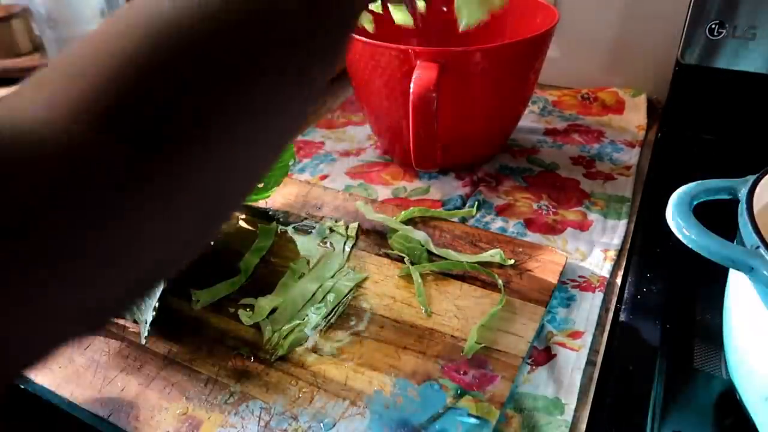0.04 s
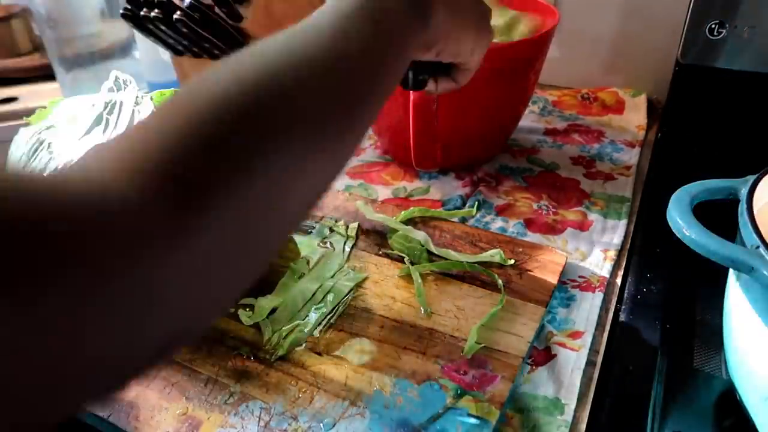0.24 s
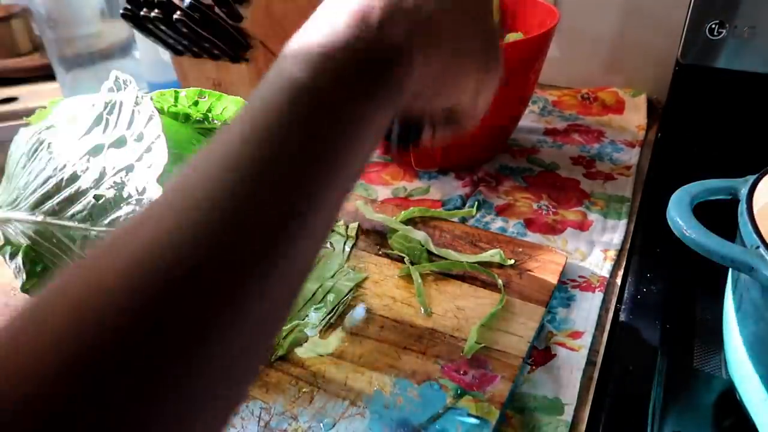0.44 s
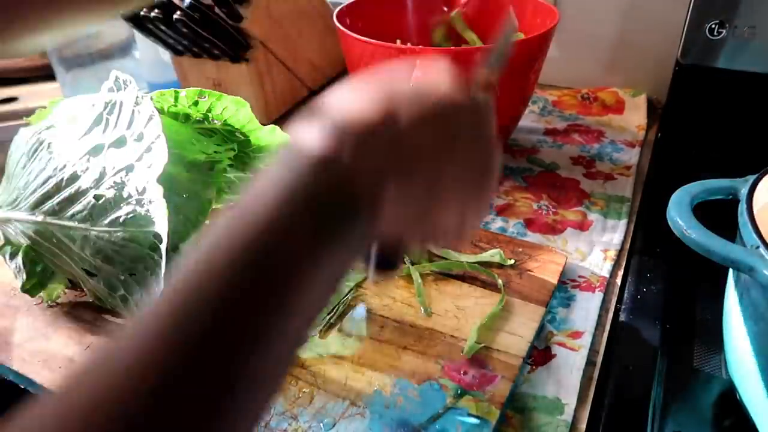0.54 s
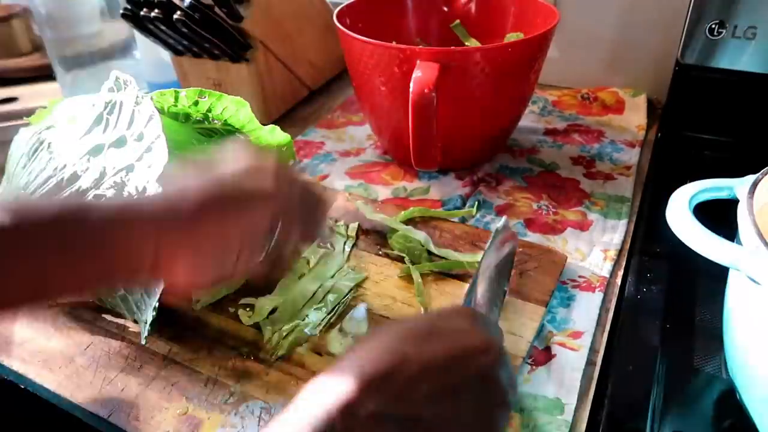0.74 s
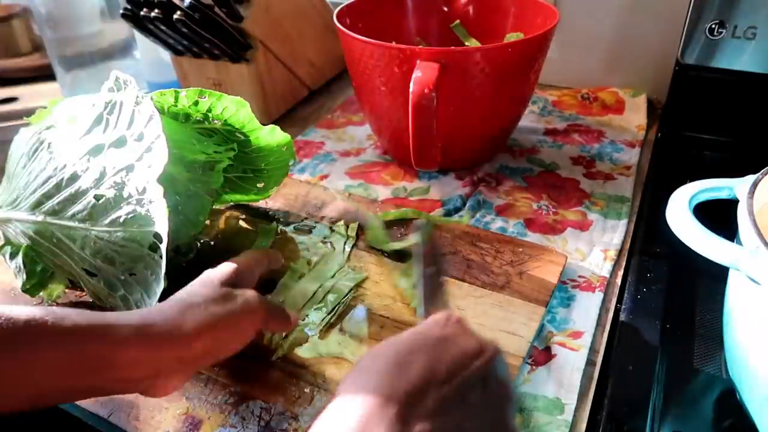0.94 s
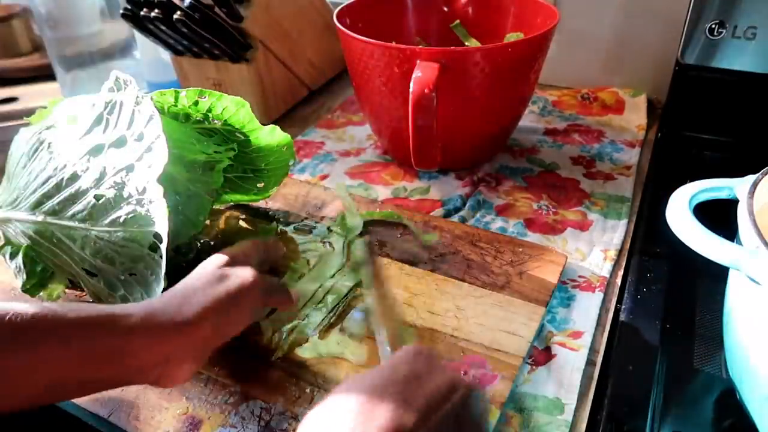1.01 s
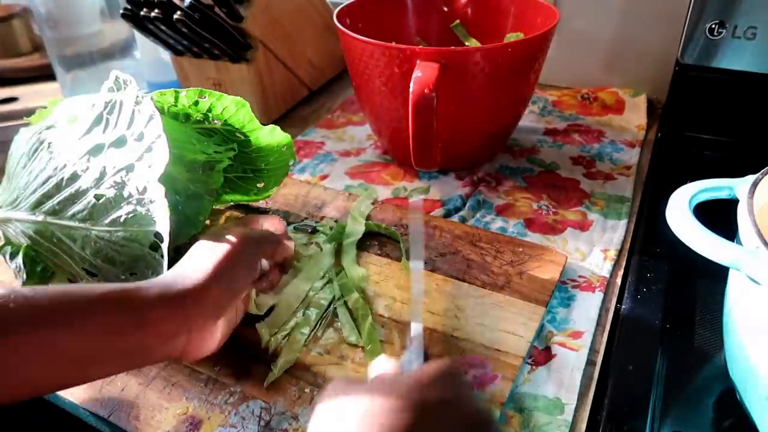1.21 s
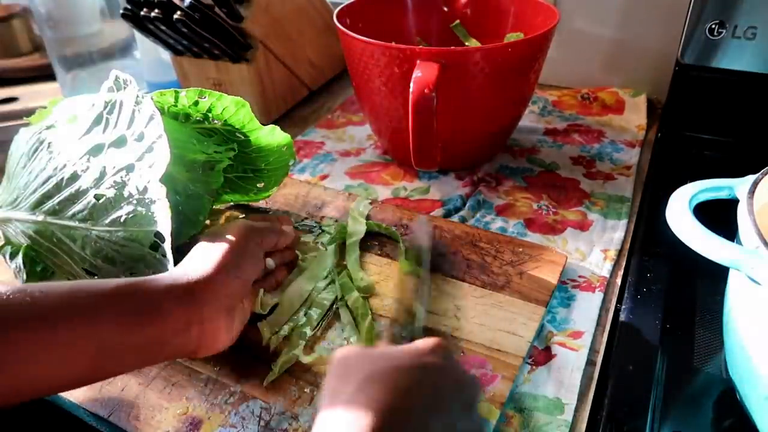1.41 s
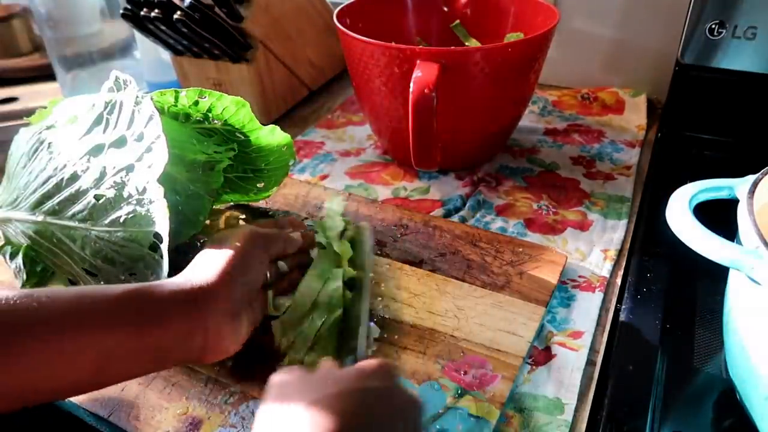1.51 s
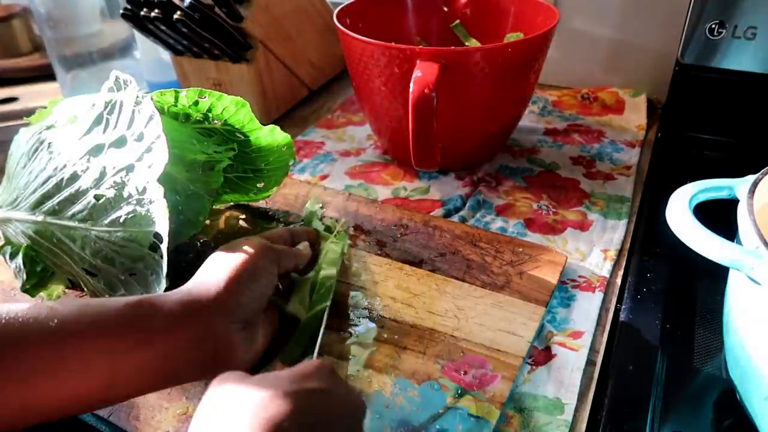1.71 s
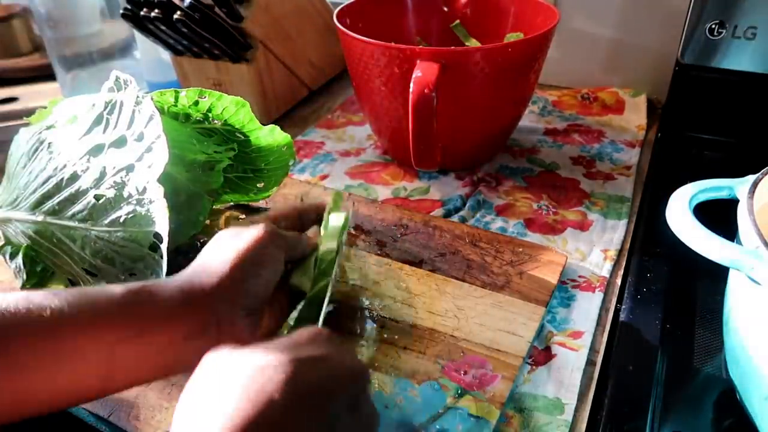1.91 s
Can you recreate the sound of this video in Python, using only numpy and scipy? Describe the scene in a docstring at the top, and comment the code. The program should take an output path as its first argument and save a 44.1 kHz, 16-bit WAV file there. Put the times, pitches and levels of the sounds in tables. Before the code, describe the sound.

Knife work on a wooden board, close in a small kitchen with quiet hum. Faint leafy rustling and soft low thuds open; at 0.24-0.31 s a plastic bowl is knocked, clattering and thumping on the counter. The blade lands hard at 0.81 s, scrapes shreds with faint metallic singing around 0.9-1.1 s, lands harder at 1.4 s, then lighter knocks at 1.5 s and faint taps until 1.8 s.

```python
"""A hand rustles faintly in a bowl, with two soft low thuds, at first; then a knife knocks the plastic bowl,
which rocks on the counter. In a small kitchen, close to a stereo phone, the blade gathers shredded cabbage
on a wooden board: it lands hard twice, scrapes the shreds between the landings, and faint taps follow.
Bowl, board, blade and counter are banks of decaying modes set ringing by contact forces; leaves are
shaped random clicks. The room rings over a quiet hum, and the loudest peaks are flattened."""
import sys
import numpy as np
from scipy import signal
from scipy.fft import rfft, irfft
from scipy.io import wavfile
from scipy.ndimage import uniform_filter1d

SR = 44100
rng = np.random.default_rng(int(sys.argv[2]) if len(sys.argv) > 2 else 0)


def bounce(signal):
    """Save signal as a 16-bit WAV file at the path given by the first command-line argument."""
    frames = np.transpose(np.atleast_2d(signal))
    limited = np.clip(frames, -1, 1)
    pcm = np.round(limited * 32767).astype(np.int16)
    wavfile.write(sys.argv[1], SR, pcm)


N = 85995  # samples
TIME_S = np.arange(N) / SR


def undb(db):
    """Amplitude ratio for a level in dB."""
    return 10 ** (np.asarray(db) / 20)


def unit(x):
    """Scale to an RMS of 1."""
    return x / np.sqrt(np.mean(x ** 2) + 1e-18)


def colour(x, table):
    """Shape the spectrum by (f/Hz, level/dB) points, joined along log frequency."""
    hz, db = np.array(table).T
    f = np.maximum(np.fft.rfftfreq(x.shape[-1], 1 / SR), 1)
    gain = undb(np.interp(np.log(f), np.log(hz), db))
    return irfft(rfft(x) * gain, x.shape[-1])


def band(x, lo_hz, hi_hz):
    """Keep the sound between two frequencies."""
    return signal.sosfilt(signal.butter(2, [lo_hz, hi_hz], "band", fs=SR, output="sos"), x)


def ring(force, modes, tilt_db=lambda hz: 0, share=1):
    """A force rings a bank of decaying modes, neighbours in opposite phase; share scales each decay."""
    out = 0
    for k, (hz, db, t60) in enumerate(modes):
        radius = np.exp(-np.log(1000) / (t60 * share * SR))
        angle = 2 * np.pi * hz / SR
        resonator = [1, -2 * radius * np.cos(angle), radius * radius]
        out = out + (-1) ** k * undb(db + tilt_db(hz)) * signal.lfilter([.5, 0, -.5], resonator, force)
    return out


def push(ms):
    """A raised-cosine contact force of unit area; a longer contact excites less treble."""
    pulse = np.hanning(int(ms * SR / 1000) + 3)[1:-1]
    return pulse / pulse.sum()


def blows(rows):
    """A force with one push at each (t/s, level/dB, contact/ms)."""
    force = np.zeros(N + 2000)
    for s, db, ms in rows:
        pulse, start = push(ms), int(s * SR)
        force[start:start + len(pulse)] += undb(db) * pulse
    return force[:N]


def grains(rate, scatter_db):
    """Random clicks of either sign, rate per second, a few much larger than the rest."""
    chance, sign, size = rng.random((3, N))
    return (chance < rate / SR) * np.sign(sign - .5) * undb(-scatter_db * np.log(1 - size))


def fade(s, db, t60):
    """A level that starts at s and dies away by 60 dB in t60 seconds."""
    t = TIME_S - s
    return undb(db - 60 * np.maximum(t, 0) / t60) * (t >= 0)


def walk(rate):
    """Smoothed random steps, rate per second, with an RMS of 1."""
    hold = int(SR / rate)
    steps = np.repeat(rng.standard_normal(N // hold + 1), hold)
    return unit(uniform_filter1d(steps, hold)[:N])


def region(centre_hz, octaves):
    """dB by which a mode is weaker, the further it lies from the region that a blow favours."""
    return lambda hz: -6 * (np.log2(hz / centre_hz) / octaves) ** 2


# spectrum of the kitchen air [f/Hz, level/dB per Hz, relative]
AIR_SPECTRUM = [(15, -44), (25, -11), (43, -0.5), (127, -6.5), (187, -14.5), (231, -4), (377, -12),
                (418, -14.5), (600, -17), (665, -21.5), (797, -24), (1600, -25.5), (12000, -47),
                (15600, -62), (22000, -120)]
HUM_DB, HUM_WIDTH = -44.5, 0.64
WHINE_HZ, WHINE_DB = 13050, -64


def hum():
    """Shaped noise for quiet kitchen air, widened above the bass, and a faint, wavering high whine."""
    mid, side = colour(rng.standard_normal((2, N)), AIR_SPECTRUM)
    side = HUM_WIDTH * band(side, 290, 21000)
    air = unit(np.array([mid + side, mid - side])) * undb(HUM_DB)
    whine = unit(band(rng.standard_normal(N), WHINE_HZ - 40, WHINE_HZ + 40))
    return air + undb(WHINE_DB) * whine


# how long the room rings [f/Hz, t60/s]
ROOM_DECAYS = [(100, 0.44), (400, 0.47), (1500, 0.63), (5000, 0.63), (12000, 0.2)]
ROOM_DB, EARLY_DB, EARLY_T60_S = -16, -10.5, 0.2
ROOM_WIDTH, TREBLE_WIDTH, WIDE_ABOVE_HZ = 0.12, 1, 9900


def room(x):
    """Dense early reflections and a longer tail whose decay depends on frequency, shortest in the treble."""
    t, tail = np.arange(SR) / SR, 0
    hz, t60 = np.array(ROOM_DECAYS).T
    for centre in 60 * 2. ** np.arange(8):  # octave bands
        noise = band(rng.standard_normal((2, SR)), centre / np.sqrt(2), centre * np.sqrt(2))
        tail = tail + noise * undb(-60 * t / np.interp(np.log(centre), np.log(hz), t60))
    early = rng.standard_normal((2, SR)) * undb(-60 * t / EARLY_T60_S)
    unit_energy = lambda h: h / np.sqrt(np.sum(h[0] ** 2))
    echo = undb(ROOM_DB) * unit_energy(tail) + undb(EARLY_DB) * unit_energy(early)
    mid, other = echo * np.minimum(t / 0.00105, 1)  # builds up over about 1 ms
    side = ROOM_WIDTH * other + TREBLE_WIDTH * band(other, WIDE_ABOVE_HZ, 10700)
    response = np.array([mid + side, mid - side])
    return signal.fftconvolve(x[None], response, axes=1)[:, :N]


# modes of the counter [f/Hz, level/dB, t60/s]
COUNTER_MODES = [(62.3, -32.5, 0.28), (135.3, -9.5, 0.081), (91, -16.5, 0.11), (185.4, -20, 0.087),
                 (225, -22, .2), (291, -19.5, 0.077), (404, -30.5, 0.76)]
# thuds through the counter [t/s, level/dB, contact/ms]
COUNTER_THUDS = [(.010, -14.5, 5.6), (.021, -17.5, 4.1), (.2425, -1.5, 1.9), (.2803, 12, 2.6),
                 (.308, 5, 3.64), (.366, -36, 1), (.53, -21.5, 5.4), (.811, -14.5, 1.4),
                 (1.4065, -8.5, 2.1)]


def thuds():
    """Soft pushes ring the low modes of the counter."""
    return ring(blows(COUNTER_THUDS), COUNTER_MODES)


# modes of the steel blade [f/Hz, level/dB, t60/s]
BLADE_MODES = [(1160, -16, 0.21), (1486, -14.5, 0.53), (1988, -19, 0.13), (2760, -26, .15),
               (3470, -17, 0.12), (4066, -18.5, 0.16), (4320, -18, 0.086), (4592, -9.5, 0.15),
               (5270, -24, 0.14), (6035, -15, 0.085), (6360, -16.5, 0.1), (6680, -19, 0.14),
               (7800, -34, 0.05)]
# one blade mode sings out while the edge drags [start t/s, length/s, near f/Hz, level/dB]
BLADE_SWELLS = [(.885, .075, 4055, -46), (.93, .07, 4590, -47), (0.987, .03, 5320, -46),
                (1.018, 0.045, 4260, -45), (1.018, .03, 6360, -38), (1.025, 0.08, 1988, -43.5),
                (1.078, 0.042, 4590, -47), (1.062, .04, 3450, -48), (1.085, .05, 4260, -50),
                (1.08, .025, 5320, -49), (1.79, 0.17, 1138, -55)]


def swells():
    """Friction, as noise, feeds one mode of the blade for a moment, rising and falling."""
    out = 0
    for s, length, hz, db in BLADE_SWELLS:
        mode = min(BLADE_MODES, key=lambda m: abs(m[0] - hz))
        tone = unit(ring(rng.standard_normal(N), [mode]))
        out = out + undb(db) * tone * np.sin(np.pi * np.clip((TIME_S - s) / length, 0, 1))
    return out


# modes of the wooden board [f/Hz, level/dB, t60/s]
BOARD_MODES = [(263.5, -5, 0.24), (394.7, 0.5, 0.11), (501, 4, 0.076), (590.6, -1, .12), (708, 2.5, 0.071),
               (798, -5.5, 0.13), (877, 2, 0.055), (987, -1, 0.04), (1092, 2, 0.083), (1292, 5, 0.037),
               (1463, 0, 0.065), (1625, -1, 0.07), (2115, -10, 0.19), (2310, -9, 0.07), (2620, -6, 0.016),
               (3115, 1, 0.03)]
# three spells: a hand rustling in the bowl, then two of scraping and handling
# [t/s, rustle level/dB, jerks in counter level/dB, jerks in board level/dB, blade over rustle level/dB]
SCRAPE_SPELLS = [
    [(0.0, -41, -40, -38, -15), (0.02, -46, -32.5, -49, -7), (0.054, -45.5, -41, -41, -14),
     (0.094, -45, -48, -43, -19), (0.104, -33, -47, -54, -6.5), (0.114, -37.5, -46, -40.5, -8.5),
     (0.214, -46.5, -41, -51, -10), (0.225, -28.5, -43, -30, -7)],
    [(0.88, -38.5, -35.5, -39, -15), (0.94, -42, -62, -42.5, -0.5), (0.968, -40, -52, -49, -5),
     (0.985, -37.5, -33, -35, -11), (1.032, -30.5, -31, -44, -3.5), (1.054, -34, -35, -33, -10),
     (1.108, -39.5, -38.5, -59, 1), (1.132, -44.5, -71, -43.5, -14), (1.218, -60, -51, -49.5, -20),
     (1.3, -73, -64, -60, -10)],
    [(1.5, -43, -47, -42, -14), (1.524, -44.5, -38, -42, -15), (1.584, -42, -41, -44, -21),
     (1.634, -38.5, -39, -34.5, 0), (1.694, -53, -56, -42.5, -21), (1.732, -48, -40.5, -60, -6),
     (1.774, -63, -64, -45, -20), (1.804, -65, -48, -55, -18), (1.82, -76, -71, -54.5, -15),
     (1.95, -79, -64, -49, -14)],
]
# spectrum of the leaves [f/Hz, level/dB per Hz, relative]
LEAF_SPECTRUM = [(290, -40), (500, -7), (1000, -15.5), (1170, -9), (1800, -14.5), (2040, -10.5),
                 (3830, -18.5), (6240, -22), (14000, -26)]
GRAINS_PER_S, GRAIN_SCATTER_DB, RUSTLE_WANDER_DB = 1900, 2.2, 3
SLIPS_PER_S, SLIP_SCATTER_DB, SLIP_MS = 900, 1.5, 1.65
SING_WANDER_DB, SING_WANDER_PER_S = 4, 22


def rustle_and_scrape():
    """Leaves crackle as random clicks; noise sings in the blade modes; small jerks ring counter and board."""
    def gain(*columns):
        total = 0
        for spell in SCRAPE_SPELLS:
            rows = np.array(spell)
            db = sum(np.interp(TIME_S, rows[:, 0], rows[:, k], -120, -120) for k in columns)
            total = total + undb(db)
        return uniform_filter1d(total, size=300)

    clicks = grains(GRAINS_PER_S, GRAIN_SCATTER_DB) * undb(RUSTLE_WANDER_DB * walk(60.16))
    leaves = unit(colour(clicks, LEAF_SPECTRUM))
    sing = 0
    for mode in BLADE_MODES:
        friction = rng.standard_normal(N) * undb(SING_WANDER_DB * walk(SING_WANDER_PER_S))
        sing = sing + ring(friction, [mode])
    slips = np.convolve(grains(SLIPS_PER_S, SLIP_SCATTER_DB), push(SLIP_MS))[:N]
    counter = unit(ring(slips, COUNTER_MODES, share=0.47))
    wood = unit(ring(slips, BOARD_MODES, share=0.38))
    return gain(1) * leaves + gain(1, 4) * unit(sing) + gain(2) * counter + gain(3) * wood


# a faint early tick, then the edge catching as it scrapes [t/s, level/dB, contact/ms, counter level/dB]
EDGE_CATCHES = [(.1, -46, .1, -33), (0.994, -31, 0.76, -7), (1.0007, -31, 1, -12), (1.0073, -27, 0.83, -7),
                (1.0223, -33.5, 0.36, -16), (1.0285, -29.5, 0.42, -15), (1.0367, -28, 0.43, -6),
                (1.0453, -32, 0.5, -11), (1.054, -33, .9, -19), (1.063, -33, 1, -27),
                (1.078, -35.5, .4, -13), (1.09, -34, .4, -24)]


def catches():
    """Each catch knocks the board, the blade and the counter, with shortened wood and counter decays."""
    force = blows([row[:3] for row in EDGE_CATCHES])
    low = blows([(s, counter_db, 2.5) for s, _, _, counter_db in EDGE_CATCHES])
    wood = ring(force, BOARD_MODES, share=0.32)
    steel = undb(-4.5) * ring(force, BLADE_MODES)
    return wood + steel + ring(low, COUNTER_MODES, share=0.34)


# modes of the plastic bowl [f/Hz, level/dB, t60/s]
BOWL_MODES = [(490.4, -5, 0.19), (608, -13, 0.072), (398, -11.5, 0.076), (930, -18.5, 0.11),
              (1085.5, -15, 0.3), (1443, -12, 0.046), (2360, -11.5, 0.19), (2510, -15, 0.16),
              (2724, -9, 0.11), (2890, -31, 0.092), (3980, -14, 0.04), (4540, -4.5, 0.068),
              (5210, -8, 0.04), (5950, -9, .05), (6110, -1, 0.056)]
# knocks on the bowl [t/s, relative level/dB, contact/ms, clatter level/dB, loudest region f/Hz, width/octaves]
BOWL_KNOCKS = [(0.2411, 8, 0.24, -6, 1200, 5.2), (0.2472, -3, 0.21, -16.5, 2400, 2.2),
               (0.2524, -5, 0.63, -22, 500, 1.3), (.259, 5, 0.6, -26, 1100, 0.89),
               (.264, -1.5, .4, -26, 1000, .8), (0.271, 2, 0.15, -20, 2750, .3),
               (0.2755, 2.5, 0.27, -10, 1600, 0.73), (.2785, 5, .15, -8, 2700, .9),
               (0.306, -19, 0.23, -30, 1100, 0.91), (0.357, -27, 0.32, -52, 1090, 1.5),
               (0.409, -39, 0.4, -31, 600, 2)]
# spectrum of the clatter [f/Hz, level/dB per Hz, relative]
CLATTER_SPECTRUM = [(290, -3), (500, -8), (990, -8.5), (1080, -3.5), (1250, -11.5), (4050, -15),
                    (10900, -30.5), (14000, -64)]
CLATTER_T60_S, SETTLE_T60_S, SETTLE_DB = 0.036, 0.31, -22  # shreds tumble, then settle more quietly
BOWL_LANDS_S, LANDED_T60_S = 0.282, 0.035  # set down, the bowl soon stops ringing


def bowl():
    """Knocks ring the plastic, clatter, and shake the shreds inside."""
    noise = unit(colour(rng.standard_normal(N) + grains(1700, 2.9), CLATTER_SPECTRUM))
    damp = fade(BOWL_LANDS_S, 0, LANDED_T60_S) + (TIME_S < BOWL_LANDS_S)
    out = 0
    for s, db, ms, clatter_db, centre_hz, octaves in BOWL_KNOCKS:
        plastic = .5 * ring(blows([(s, db, ms)]), BOWL_MODES, region(centre_hz, octaves))
        if s < BOWL_LANDS_S:
            plastic = plastic * damp
        clatter = fade(s, clatter_db, CLATTER_T60_S)
        settling = fade(s, clatter_db + SETTLE_DB, SETTLE_T60_S)
        out = out + plastic + noise * (clatter + settling)
    return out


# blade on the board [t/s, relative level/dB, contact/ms, loudest region f/Hz, width/octaves,
# spacing of the modes this spot favours f/Hz, then, relative to the blow: blade level/dB,
# crack level/dB, crunch of crushed leaves level/dB; left minus right level/dB]
BOARD_BLOWS = [(.8104, -1, 0.15, 1000, 1.5, 1300, -19.5, -16, -26, 2.5),
               (.8195, -9, .6, 590, .2, 9000, -30, -30, -40, 2),
               (.829, -17, .3, 1625, .15, 9000, -30, -30, -40, 2),
               (1.398, -28, 0.3, 860, .6, 9000, -30, -31, -18, -1),
               (1.4055, 4, 0.25, 1020, 1.5, 653, -30, -18, -44, 2),
               (1.421, -7, .4, 1090, 0.1, 9000, -37, -35, -43, 1),
               (1.430, -23, .2, 2100, .2, 9000, -28, -30, -38, 2),
               (1.438, -8, .45, 1110, 0.4, 9000, -36, -39, -32, 3),
               (1.513, -18, 0.79, 394, 1.6, 3000, -48, -37, -40, 0),
               (1.5362, -9, 1.0, 395, 1.6, 3020, -30, -37, -39, 1.5),
               (1.555, -16.5, 1.1, 333, 0.76, 3000, -30, -27, -47, 5),
               (1.605, -29, 0.56, 2200, 1, 9000, -30, -4, -12, 2),
               (1.629, -31.5, 0.25, 1280, 0.35, 9000, -32, -5, -15, 7),
               (1.720, -22.5, 0.33, 494, 0.32, 3000, -45, -28, -41, 0),
               (1.727, -23.5, 1.05, 496, 0.23, 3000, -41, -43, -42, 0),
               (1.733, -23, 0.73, 499, 0.36, 3000, -43, -38, -37, 1),
               (1.741, -27, 0.88, 412, 0.75, 2980, -37, -40, -36, 0),
               (1.7415, -29.5, .15, 2320, 0.2, 9000, -37, -13.5, -25.5, 3),
               (1.791, -21, 0.087, 2370, 0.13, 8900, -40, -38, -39, 3),
               (1.791, -34, 0.35, 1100, 0.39, 9000, -40, -34, -34, -1)]
SLAP_DB, SLAP_PER_DB, SLAP_SHARE = 12, 0.32, 0.13  # extra short ring; softer landings slap less
MISS_DB = -7.5  # for modes midway between those that the spot favours
CRACK_T60_S, CRACK_HZ, CRUNCH_T60_S, CRUNCH_HZ = 0.013, 2900, 0.22, 2670


def board():
    """Each landing rings the board where it is struck, the blade a little, with a crack and a crunch."""
    out = 0
    noise = unit(band(rng.standard_normal(N), CRACK_HZ / 3, CRACK_HZ * 3.57))
    leaves = unit(band(grains(3000, 1.7), CRUNCH_HZ / 1.41, CRUNCH_HZ * 1.27))
    for s, db, ms, region_hz, octaves, miss_hz, blade_db, crack_db, crunch_db, pan_db in BOARD_BLOWS:
        favoured = region(region_hz, octaves)
        tilt = lambda hz: favoured(hz) + MISS_DB * np.sin(np.pi * hz / miss_hz) ** 2
        force = blows([(s, db - 12, ms)])
        slap = undb(SLAP_DB + SLAP_PER_DB * db) * ring(force, BOARD_MODES, tilt, share=SLAP_SHARE)
        wood = ring(force, BOARD_MODES, tilt) + slap
        steel = ring(blows([(s, db + blade_db, .05)]), BLADE_MODES)
        crack = noise * fade(s, db + crack_db, CRACK_T60_S)
        crunch = leaves * fade(s, db + crunch_db, CRUNCH_T60_S)
        pan = undb(np.array([[pan_db], [-pan_db]]) / 2)
        out = out + (wood + steel + crack + crunch) * pan
    return out


def scene():
    """Everything close to the microphones, its ring in the room, and the hum behind."""
    near = thuds() + swells() + rustle_and_scrape() + catches() + bowl() + board()
    return hum() + room(near.mean(axis=0)) + near


PORT_LAG_S, BASS_CUT_HZ, TOP_HZ = 3.0e-5, 20, 15500
PEAK_LIMIT = 1.


def record(dry):
    """Sound reaches the right microphone port a moment late; deep bass is lost, peaks flatten, the top is cut."""
    f = np.fft.rfftfreq(N, 1 / SR)
    late = irfft(rfft(dry[1]) * np.exp(-2j * np.pi * f * PORT_LAG_S), N)
    bass_cut = signal.butter(1, BASS_CUT_HZ, "high", fs=SR, output="sos")
    x = signal.sosfilt(bass_cut, np.array([dry[0], late]))
    top_cut = signal.ellip(8, .2, 70, TOP_HZ, fs=SR, output="sos")
    return signal.sosfilt(top_cut, np.clip(x, -PEAK_LIMIT, PEAK_LIMIT))


dry = scene()
out = record(dry)
bounce(out)
```